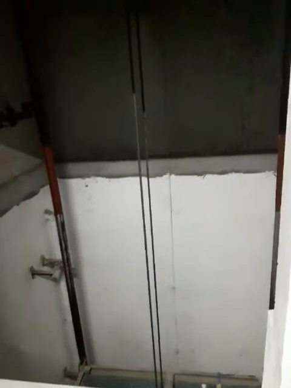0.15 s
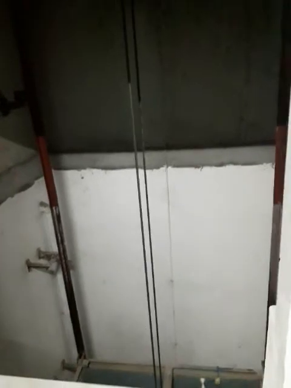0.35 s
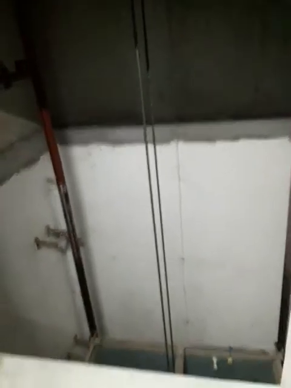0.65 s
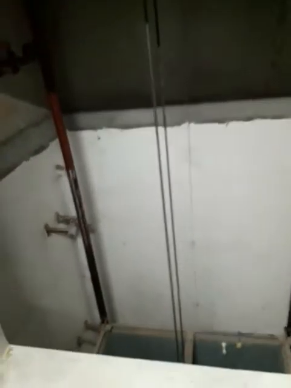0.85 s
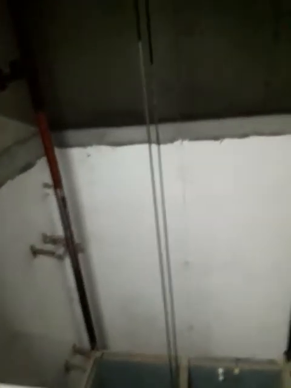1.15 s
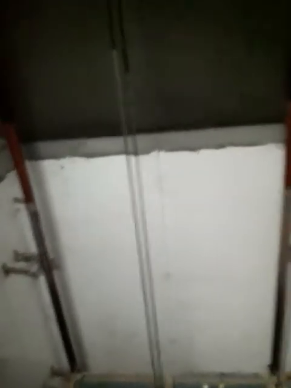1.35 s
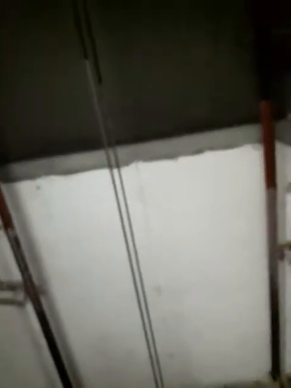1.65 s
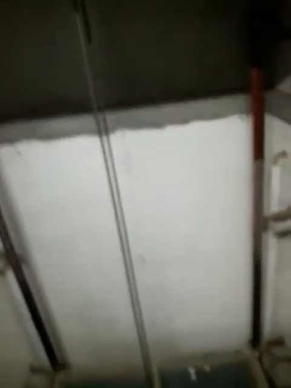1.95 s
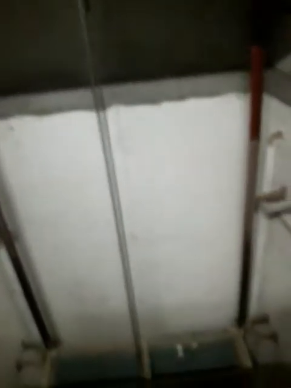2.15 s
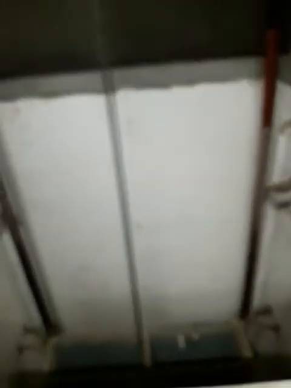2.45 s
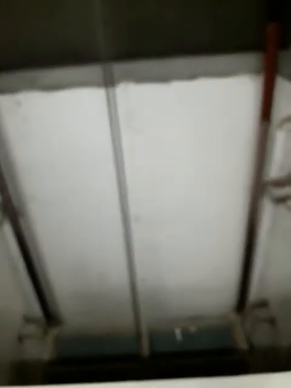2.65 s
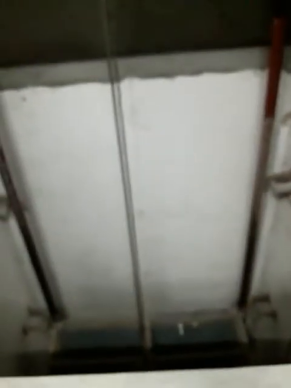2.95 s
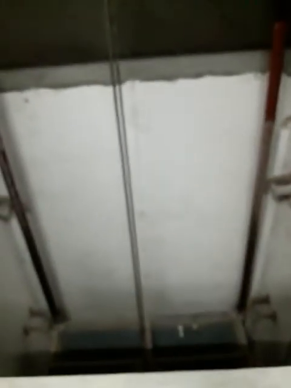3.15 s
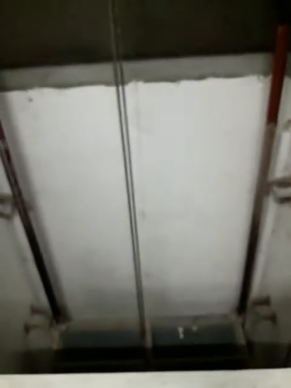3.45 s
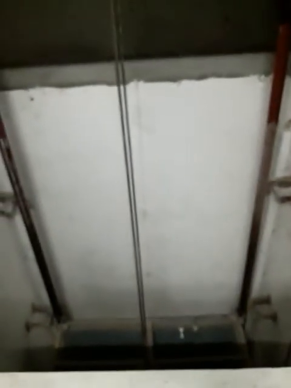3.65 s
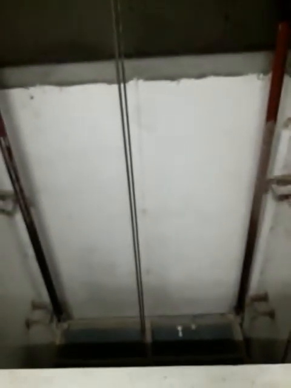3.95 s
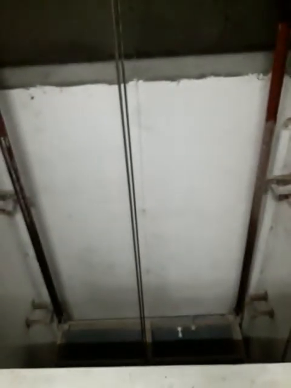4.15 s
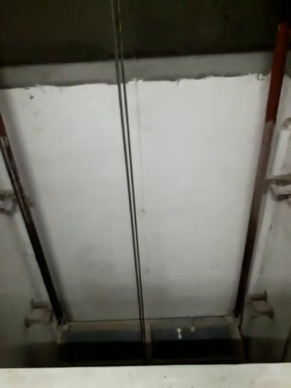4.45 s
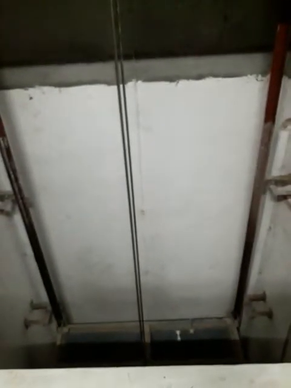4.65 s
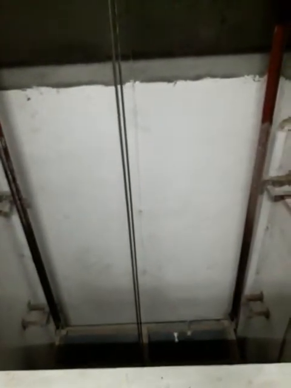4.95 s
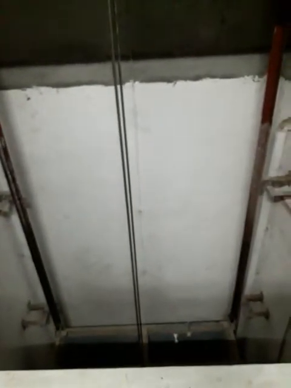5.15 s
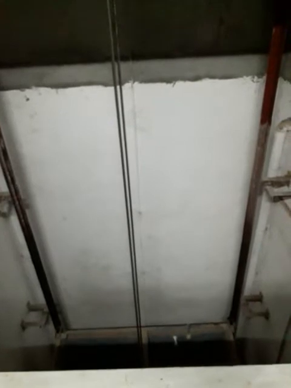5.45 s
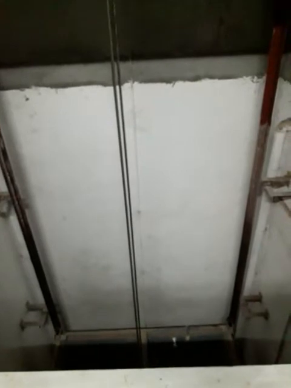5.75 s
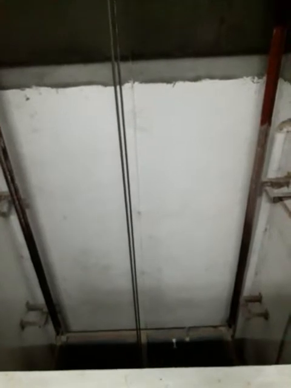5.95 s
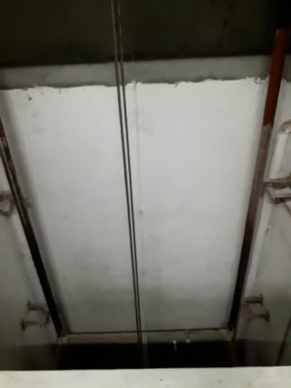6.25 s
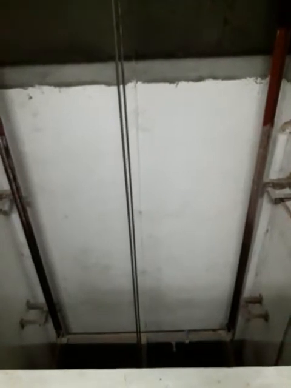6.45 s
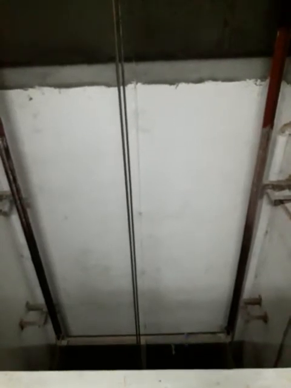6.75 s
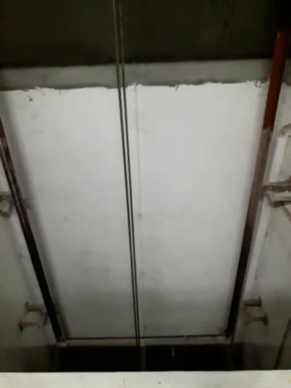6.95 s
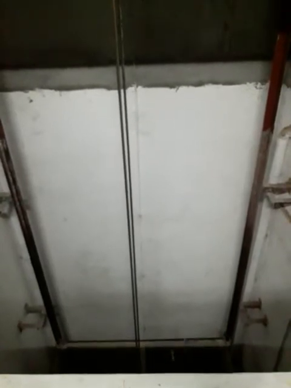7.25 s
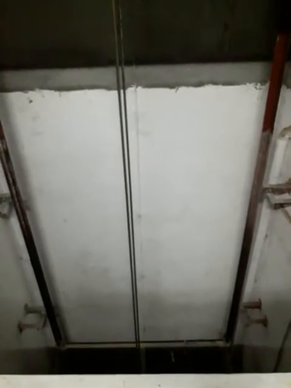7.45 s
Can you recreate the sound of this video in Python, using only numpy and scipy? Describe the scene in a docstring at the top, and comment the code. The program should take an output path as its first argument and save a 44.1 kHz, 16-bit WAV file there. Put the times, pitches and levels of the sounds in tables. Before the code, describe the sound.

A passenger lift travels through a concrete shaft with a continuous low, hollow rumble. Under it a drive hum wavers and beats, while the frame and sheet panels drone. Hollow surges swell early, most strongly in the first second and a half, then again near the middle. Guide shoes hiss softly on the rails, with faint scrapes and squeals around five seconds and at the end. Close, single-channel pickup in the enclosed shaft, with thin high hiss behind.

```python
"""A deep, booming rumble fills a concrete shaft as a passenger lift travels along it, heard from inside.
Noise through narrow resonances makes the booming air modes and the rattling hum of car frame and panels.
Wavering sines make the hum and whine of the drive; shaped noise makes the rush of air in each surge.
The guide shoes slide along the steel rails with a soft hiss, and now and then scrape or squeal.
A thin, high hiss lies behind it all."""
import sys
import numpy as np
from scipy import signal
from scipy.fft import rfft, irfft, next_fast_len
from scipy.io import wavfile
from scipy.ndimage import uniform_filter1d

SR = 44100
rng = np.random.default_rng(int(sys.argv[2]) if len(sys.argv) > 2 else 0)


def waveform_to_disk(signal):
    """Save audio, clipped to [-1, 1], as 16-bit WAV at the path in sys.argv[1]."""
    frames = np.transpose(np.atleast_2d(signal))
    scaled = np.clip(frames, -1, 1) * 32767
    samples = np.round(scaled).astype(np.int16)
    wavfile.write(sys.argv[1], SR, samples)


N = 336042


def from_db(db):
    """Decibels to amplitude gain."""
    return 10 ** (np.asarray(db) / 20)


def rms_one(x):
    """Scale to unit rms."""
    return x / np.sqrt(np.mean(x ** 2) + 1e-20)


def seconds():
    """The time of every sample, in seconds."""
    return np.arange(N) / SR


def level_curve(rows):
    """Gain at every sample, from straight lines in dB between the points of a level table."""
    times, levels_db = np.transpose(rows)
    return from_db(np.interp(seconds(), times, levels_db))


def shaped_noise(response):
    """Steady white noise weighted by an amplitude response over frequency; rms 1."""
    size = next_fast_len(N, real=True)
    hz = np.maximum(np.fft.rfftfreq(size, 1 / SR), 1)
    spectrum = rfft(rng.standard_normal(size)) * response(hz)
    return rms_one(irfft(spectrum, size)[:N])


def coloured(spectrum):
    """Noise with a smooth spectrum, drawn in dB over log frequency."""
    points_hz, points_db = np.transpose(spectrum)
    return shaped_noise(lambda hz: from_db(np.interp(np.log(hz), np.log(points_hz), points_db)))


def resonating(modes):
    """Noise ringing in steep-sided resonances; each mode's dB sets its whole power against the others."""
    def response(hz):
        power = 0
        for centre, width, db in modes:
            power = power + from_db(db) ** 2 / width / (1 + ((hz - centre) / width) ** 2) ** 2
        return np.sqrt(power)
    return shaped_noise(response)


def steadied(x, span_s):
    """Even out swells slower than the span, to about unit rms, and keep the faster beating."""
    power = uniform_filter1d(x ** 2, max(int(span_s * SR), 2))
    return x / np.sqrt(np.maximum(power, 0) + 1e-9)


def drift(rate_hz):
    """Slow random wavering with spread 1, mostly below the given rate."""
    return shaped_noise(lambda hz: 1 / (1 + (hz / rate_hz) ** 2))


def tone(hz, wander_hz, flutter_db, rate_hz):
    """A sine whose pitch and level waver by chance; rms 1."""
    phase = 2 * np.pi * np.cumsum(hz + wander_hz * drift(rate_hz)) / SR
    return rms_one(np.sin(phase) * from_db(flutter_db * drift(rate_hz)))


def arch(middle_s, length_s):
    """A swell that rises and falls as half a sine."""
    return np.cos(np.pi * np.clip((seconds() - middle_s) / length_s, -.5, .5))


# spread of the rumble's random level, and its rate
AIR_WAVER_DB, CAR_WAVER_DB, WAVER_HZ = 1, 0.85, 7


def receding(start_db, fade_db_per_s, waver_db):
    """Gain of a wavering sound that fades as the car draws away."""
    return from_db(start_db - fade_db_per_s * seconds() + waver_db * drift(WAVER_HZ))


# surges of the ride: (crest time [s], rise spread [s], fall spread [s],
#                      rush of air level [dB], hollow ringing level [dB])
RIDE_SURGES = [(0.719, .29, .27, -44, -23.5), (1.3, 0.059, .11, -55.5, -27.5), (1.68, 0.15, .2, -49, -37),
               (3.7, .08, 0.061, -53, -29), (5.1, .12, .15, -55.5, -33), (7.54, 0.081, .2, -47.5, -38)]


def surges():
    """Each surge is a bell-shaped hump; gives the gains of the rushing air and of the hollow ringing."""
    t, gust, ringing = seconds(), 0, 0
    for crest, rise, fall, air_db, ring_db in RIDE_SURGES:
        spread = np.where(t < crest, rise, fall)
        hump = np.exp(-.5 * ((t - crest) / spread) ** 2)
        gust = gust + from_db(air_db) * hump
        ringing = ringing + from_db(ring_db) * hump
    return gust, ringing


# colour of the high hiss: (frequency [Hz], relative level [dB])
HISS_SPECTRUM = [(100, 0), (2500, -10), (4500, -10), (5600, -13), (7000, -20), (8500, -26), (9800, -17),
                 (11500, -9), (12800, -5), (13400, -3.5), (15500, 3), (17000, -3.5)]
# steady level, and level in a surge relative to its rush of air
HISS_DB, HISS_SURGE_DB = -65.5, -25


def high_hiss(gust):
    """Steady shaped noise, thin and high, that lifts a little in each surge."""
    level = np.hypot(from_db(HISS_DB), from_db(HISS_SURGE_DB) * gust)
    return level * coloured(HISS_SPECTRUM)


# colour of shoes rubbing on rails: (frequency [Hz], relative level [dB])
RUB_SPECTRUM = [(1000, -14), (1500, 0.5), (1800, 3), (2100, 0.5), (2400, -4.5), (2750, -14), (3000, -13),
                (4000, -13), (4500, -17.5), (5400, -18.5), (7000, -34), (12000, -54.5)]
# rubbing of the shoes, before a 1.5 dB lift: (time [s], level [dB])
RUB_LEVEL = [(0, -65), (0.15, -68.5), (0.7, -61.3), (1.15, -66.5), (1.7, -64.5), (2.8, -67.5), (3.25, -70),
             (3.7, -65), (4.5, -69.3), (5.1, -67.5), (6.0, -67.9), (6.4, -72), (6.7, -66.5), (7.0, -71.5),
             (7.62, -62.5)]
# ringing of the steel rail: (frequency [Hz], half-width [Hz], relative level [dB])
RAIL_RESONANCES = [(3390, 130, 1.5), (3640, 210, 2.5), (4030, 240, 0), (5100, 600, -13)]
# loudness of that ringing, before a 2 dB cut: (time [s], level [dB])
RINGING_LEVEL = [(0, -80.5), (0.8, -71), (1.15, -79), (1.7, -73.5), (2.35, -73.6), (3.2, -76.9),
                 (3.7, -75.2), (4.3, -76), (5.0, -73.5), (5.6, -76.5), (7.2, -75), (7.62, -74.5)]
# a shoe catches and scrapes: (time [s], level [dB], time to decay by 60 dB [s])
SHOE_SCRAPES = [(4.865, -58.8, .9), (5.27, -66, .8), (7.46, -62.5, 1.5)]
# resonances of the scraping shoe: (frequency [Hz], half-width [Hz], relative level [dB])
SCRAPE_RESONANCES = [(1580, 110, -1.5), (1820, 100, 0), (2150, 260, 2), (5100, 600, -10.5)]
# thin squeals of a shoe: (middle time [s], length [s], pitch [Hz], peak level [dB])
SHOE_SQUEALS = [(0.738, .4, 3480, -73.5), (2.38, 0.2, 3570, -76.5), (4.72, 0.36, 3490, -78),
                (4.96, .25, 3560, -74), (5.237, 0.2, 3560, -71.5), (7.56, .2, 3380, -71)]


def guide_shoes():
    """Sliding friction hisses and sets the steel rail ringing; now and then a shoe scrapes or squeals."""
    t = seconds()
    grip = from_db(0.5 * drift(7.6))   # the rail's surface is uneven
    rubbing = from_db(1.5) * level_curve(RUB_LEVEL) * coloured(RUB_SPECTRUM)
    singing = from_db(-2.0) * level_curve(RINGING_LEVEL) * resonating(RAIL_RESONANCES)
    catching = 0
    for start, db, t60 in SHOE_SCRAPES:
        onset = np.clip((t - start) / .02, 0, 1)   # 20 ms ramp
        catching = catching + from_db(db - 60 * np.abs(t - start) / t60) * onset
    out = grip * (rubbing + singing) + catching * resonating(SCRAPE_RESONANCES)
    for middle, length, hz, db in SHOE_SQUEALS:
        out = out + from_db(db) * arch(middle, length) * resonating([(hz, 120, 0)])
    return out


# close tones of the hum: (frequency [Hz], relative level [dB])
HUM_TONES = [(274.8, 2), (283.8, -1.5)]
# load on the drive, heard as hum, before a 0.2 dB cut: (time [s], level [dB])
DRIVE_LOAD = [(0, -28), (0.3, -32.7), (0.9, -28.5), (1.7, -29), (2.1, -31), (3.2, -35), (3.75, -25.5),
              (4.35, -32.5), (4.6, -29.5), (5.1, -38), (6.1, -39.5), (6.9, -34), (7.62, -33.5)]
# faint whine: (frequency [Hz], level [dB])
WHINE_TONES = [(959, -61.5), (991, -59.5), (1397, -69), (1473, -73.5)]


def drive():
    """Two close tones beat in a low hum that follows the load; a faint, rough whine lies above."""
    hum = sum(from_db(db) * tone(hz, wander_hz=1.29, flutter_db=3.5, rate_hz=3.24)
              for hz, db in HUM_TONES)
    whine = sum(from_db(db) * tone(hz, wander_hz=4.89, flutter_db=4.0, rate_hz=8.65)
                for hz, db in WHINE_TONES)
    return from_db(-0.2) * level_curve(DRIVE_LOAD) * steadied(hum, span_s=0.13) + whine


# colour of the rushing air: (frequency [Hz], relative level [dB])
RUSH_SPECTRUM = [(600, -11.5), (800, 2.5), (900, 5), (1000, 0.5), (1090, -1.5), (1170, 0.5), (1260, 4),
                 (1380, -3.5), (1480, -6), (1650, -11.5), (1850, -27), (2200, -43.5), (3000, -65)]
RUSH_DB, RUSH_FADE_DB_PER_S = -48, .5   # steady level at the start, and its fade


def rushing_air(gust):
    """Air rushes past the car as shaped noise, harder in each surge."""
    steady = receding(RUSH_DB, RUSH_FADE_DB_PER_S, waver_db=0.52)
    return np.hypot(steady, gust) * coloured(RUSH_SPECTRUM)


# swells of one air mode: (middle time [s], length [s], pitch [Hz], peak level [dB])
AIR_BOOMS = [(0.87, 0.67, 46, -40), (1.55, 0.43, 192.3, -23.5), (2.0, 0.46, 187, -29.5),
             (2.85, 0.33, 184, -27), (3.738, .25, 183, -29), (3.65, 0.19, 78, -31), (4.102, 0.47, 124, -27),
             (4.478, 0.15, 125, -23), (7.423, 0.55, 79.6, -29.5), (7.5, .4, 199, -29.5)]
BOOM_WIDTH_HZ = 9   # half-width of the resonance


def booms():
    """Now and then one air mode of the shaft swells above the rest and dies away."""
    out = 0
    for middle, length, hz, db in AIR_BOOMS:
        ringing = steadied(resonating([(hz, BOOM_WIDTH_HZ, 0)]), span_s=0.058)
        out = out + from_db(db) * arch(middle, length) * ringing
    return out


# resonances of the car frame: (frequency [Hz], half-width [Hz], relative level [dB])
FRAME_RESONANCES = [(257, 29, -5), (298.6, 4.8, 2), (343, 5.7, -2.5), (336, 8.4, -6), (353, 4.6, -3),
                    (362, 17, -9.5), (386.5, 8.2, 5.5), (405, 2.1, 1), (413.3, 3.3, -2), (400, 15, -7),
                    (438.4, 6, 0.5), (466, 2.8, -10), (476, 26, -4.5), (503.5, 7.3, -4)]
# broad roar around the frame: (frequency [Hz], relative level [dB])
ROAR_SPECTRUM = [(150, -29), (240, -2.5), (280, -3.5), (315, -2), (360, -2), (420, -8.5), (450, -7.5),
                 (510, -4.5), (545, -16), (700, -23), (1200, -75)]
ROAR_DB, ROAR_FADE_DB_PER_S = -29, 0.07   # level at the start, and its fade
# resonances of the car panels: (frequency [Hz], half-width [Hz], relative level [dB])
PANEL_RESONANCES = [(645, 9.9, -2), (639, 6.4, 0), (668, 16, 1), (727, 8, -3.5), (753, 12, -4),
                    (750, 2.4, 0.5), (868, 5.3, -15)]
# broad drone around the panels: (frequency [Hz], relative level [dB])
DRONE_SPECTRUM = [(400, -14), (540, -2), (600, 3.5), (660, 7), (750, -2.5), (785, -6.5), (850, -7),
                  (950, -20.5), (1200, -59)]
# loudness of the panels' drone: (time [s], level [dB])
PANEL_LEVEL = [(0, -38.5), (.75, -34.5), (1.1, -39), (1.6, -35), (1.9, -38), (2.25, -35), (2.8, -35.5),
               (3.2, -39.5), (4.05, -36), (5.45, -38.5), (5.9, -35), (6.5, -38.5), (7.62, -36)]
# resonances that ring in a surge: (frequency [Hz], half-width [Hz], relative level [dB])
SURGE_RESONANCES = [(238, 12, -3), (275, 17, 2), (330, 4.9, 4), (343, 10, 2.5), (386, 12, -8),
                    (414, 3.8, -2.5), (490, 3.3, -8.5), (541, 9, -18), (708, 5.4, -12.5), (807, 18, -16.5),
                    (990, 6.9, -25), (50.4, 1.5, -13.5)]


def car(ringing):
    """Rolling shakes the frame of the car and its sheet-metal panels; surges make it ring hollowly."""
    frame = from_db(-3.5) * resonating(FRAME_RESONANCES) + from_db(-3.5) * coloured(ROAR_SPECTRUM)
    panels = from_db(-5.5) * resonating(PANEL_RESONANCES) + from_db(1.0) * coloured(DRONE_SPECTRUM)
    roar_level = receding(ROAR_DB, ROAR_FADE_DB_PER_S, CAR_WAVER_DB)
    drone_level = level_curve(PANEL_LEVEL) * from_db(CAR_WAVER_DB * drift(WAVER_HZ))
    roar = roar_level * steadied(frame, span_s=0.16)
    drone = drone_level * steadied(panels, span_s=1.0)
    swell = ringing * steadied(resonating(SURGE_RESONANCES), span_s=0.36)
    return roar + drone + swell


# lowest modes of the air column: (frequency [Hz], half-width [Hz], relative level [dB])
COLUMN_RESONANCES = [(37, 10, -21), (44, 1.2, -11), (48, 1.4, 0), (54, 3, -7)]
# steady level, and level in a surge relative to its rush of air
COLUMN_DB, COLUMN_SURGE_DB = -52.5, -1.5
# deep air modes, narrow and damped: (frequency [Hz], half-width [Hz], relative level [dB])
DEEP_RESONANCES = [(56.4, 1.9, -17), (73.5, 13, 2), (75.67, 1.5, -1), (80.7, 6.7, -2), (87, 4, 0.5),
                   (81, 6.9, -9.5)]
# loudness of the deep modes: (time [s], level [dB])
THROB_LEVEL = [(0, -34), (.3, -40.5), (.55, -34), (2.8, -33), (3.2, -36), (4.5, -33), (5.3, -38),
               (6.2, -33.5), (7.62, -37.5)]
# middle air modes: (frequency [Hz], half-width [Hz], relative level [dB])
MIDDLE_RESONANCES = [(110.1, 3.1, -4), (122.2, 7, 3.5), (126.1, 3.9, 3.5), (138.9, 2.7, 2), (134, 6.7, -11),
                     (157.3, 4, -3.5), (138, 7.8, -5.5)]
# loudness of the middle modes: (time [s], level [dB])
MIDDLE_LOUDNESS = [(0, -30.5), (.6, -31), (1.3, -28), (2.4, -28), (2.85, -31), (3.5, -27.5), (4.3, -28.5),
                   (4.85, -30), (5.15, -29), (6.3, -28), (6.8, -32), (7.62, -31)]
# upper air modes: (frequency [Hz], half-width [Hz], relative level [dB])
UPPER_RESONANCES = [(173, 6.7, 1.5), (187, 18, 0.5), (186.7, 0.42, -3), (192.4, 5.5, -3.5),
                    (192, 3.4, -14.5), (224.1, 3.2, -4.5), (207, 40, 0)]
UPPER_DB, UPPER_FADE_DB_PER_S = -29.7, 0.12   # level at the start, and its fade


def shaft(gust):
    """The moving car pushes air ahead of it and keeps the air modes of the shaft ringing."""
    column_level = np.hypot(from_db(COLUMN_DB), from_db(COLUMN_SURGE_DB) * gust)
    column = column_level * steadied(resonating(COLUMN_RESONANCES), span_s=0.24)
    throb_level = level_curve(THROB_LEVEL) * from_db(AIR_WAVER_DB * drift(WAVER_HZ))
    throb = throb_level * steadied(resonating(DEEP_RESONANCES), span_s=0.38)
    middle = level_curve(MIDDLE_LOUDNESS) * steadied(resonating(MIDDLE_RESONANCES), span_s=0.16)
    hollow_level = receding(UPPER_DB, UPPER_FADE_DB_PER_S, AIR_WAVER_DB)
    hollow = hollow_level * steadied(resonating(UPPER_RESONANCES), span_s=0.16)
    return column + throb + middle + hollow


# brief dips of the whole rumble: (middle time [s], length [s], change at the middle [dB])
RUMBLE_DIPS = [(4.305, .13, -2.5)]


def scene():
    """The lift in its shaft: the rumble dips briefly as one; air, shoes and high hiss lie over it."""
    gust, ringing = surges()
    dipping = from_db(sum(db * arch(middle, length) for middle, length, db in RUMBLE_DIPS))
    rumble = drive() + booms() + car(ringing) + shaft(gust)
    mix = high_hiss(gust) + guide_shoes() + rushing_air(gust) + dipping * rumble
    return mix[None]   # one channel


CUTOFF_HZ = 15800


def record(dry):
    """A steep elliptic low-pass cuts the top."""
    low_pass = signal.ellip(12, .1, 80, CUTOFF_HZ, fs=SR, output="sos")   # 0.1 dB ripple, 80 dB stop
    return signal.sosfilt(low_pass, dry)


dry = scene()
out = record(dry)
waveform_to_disk(out)
```